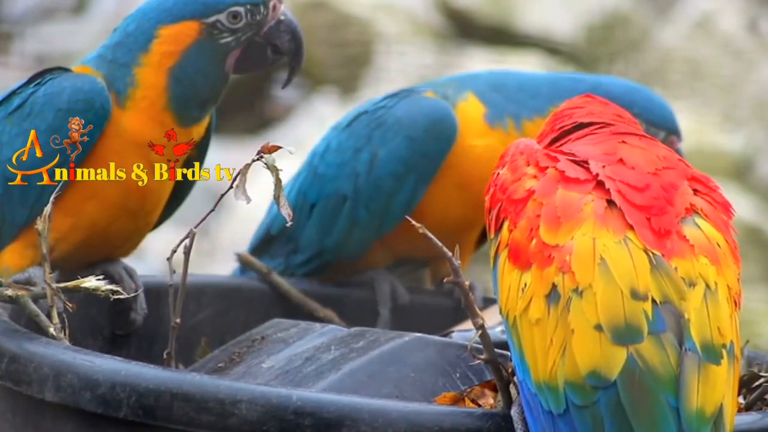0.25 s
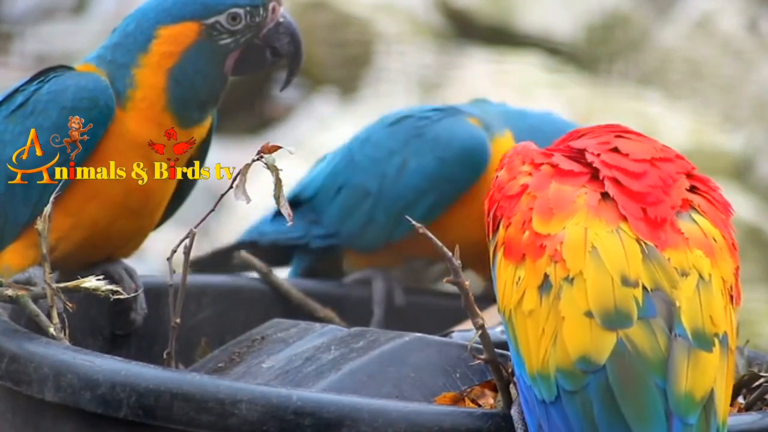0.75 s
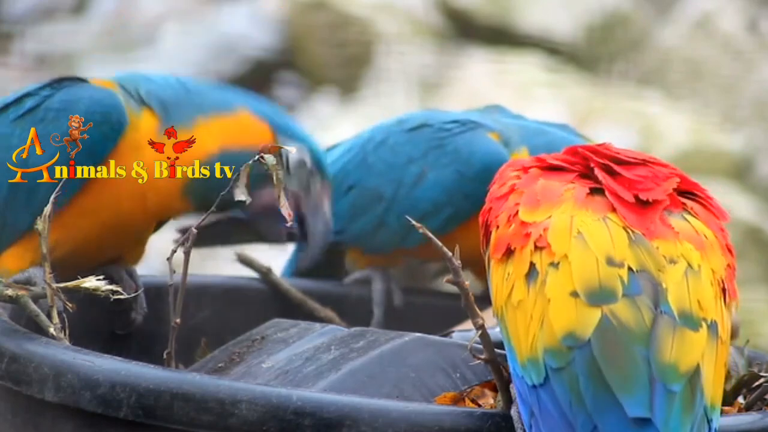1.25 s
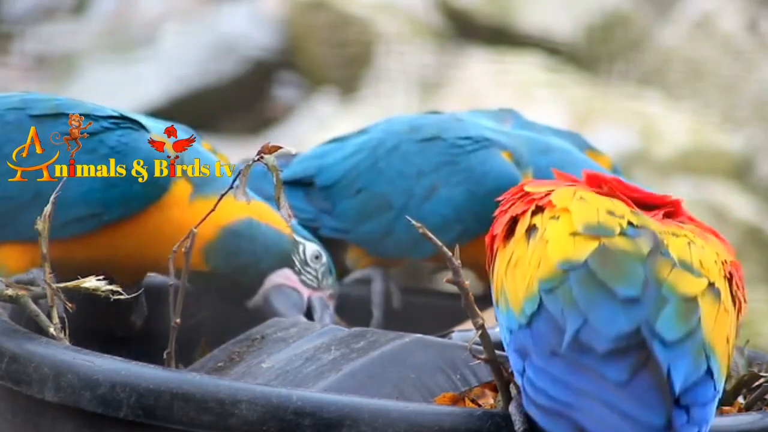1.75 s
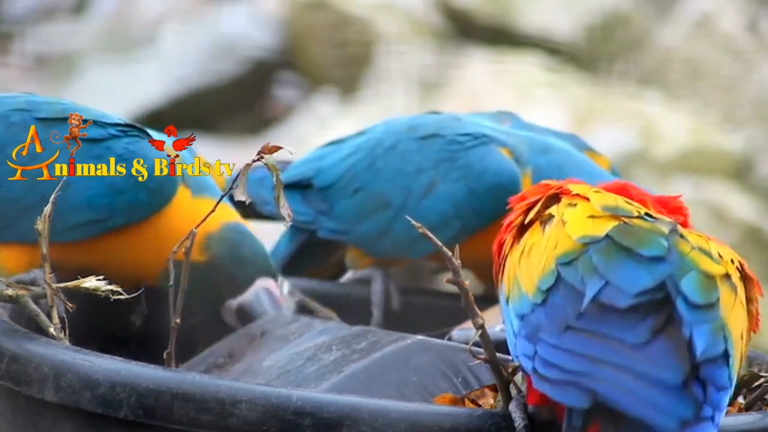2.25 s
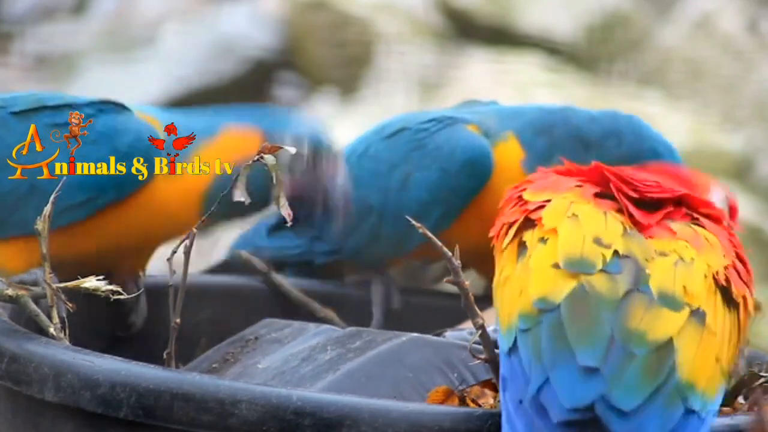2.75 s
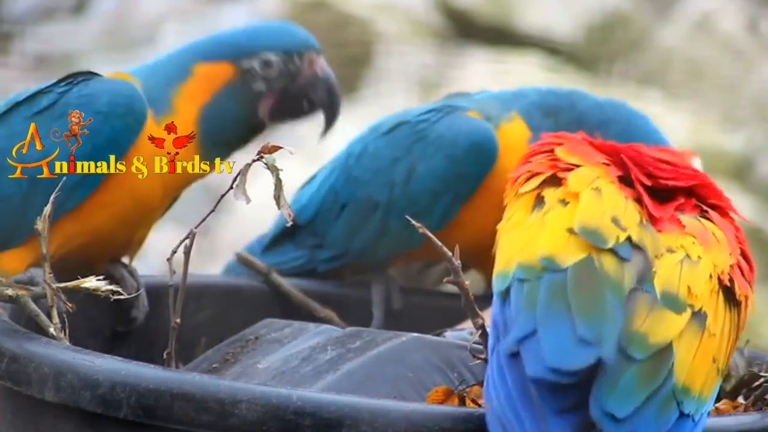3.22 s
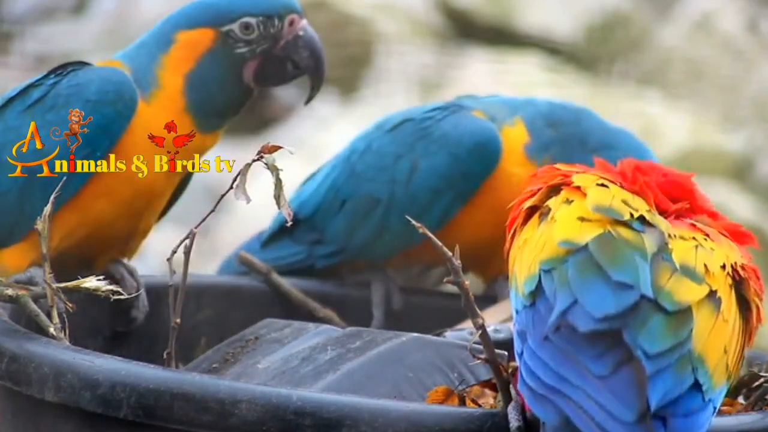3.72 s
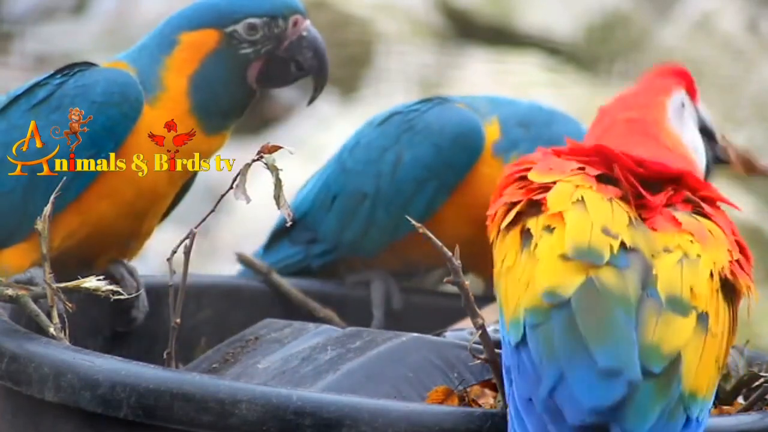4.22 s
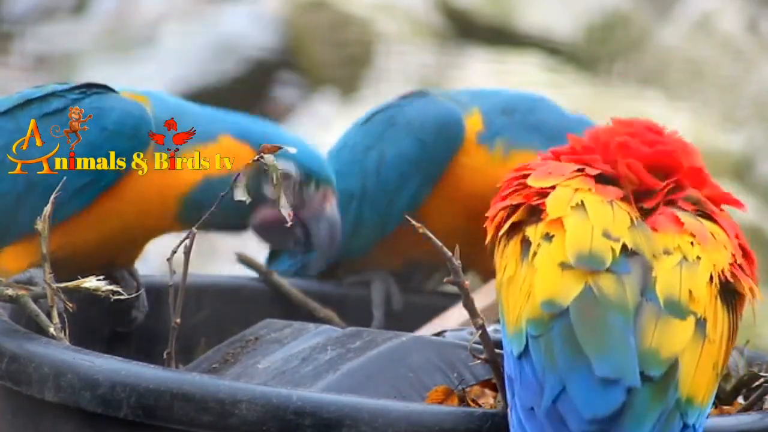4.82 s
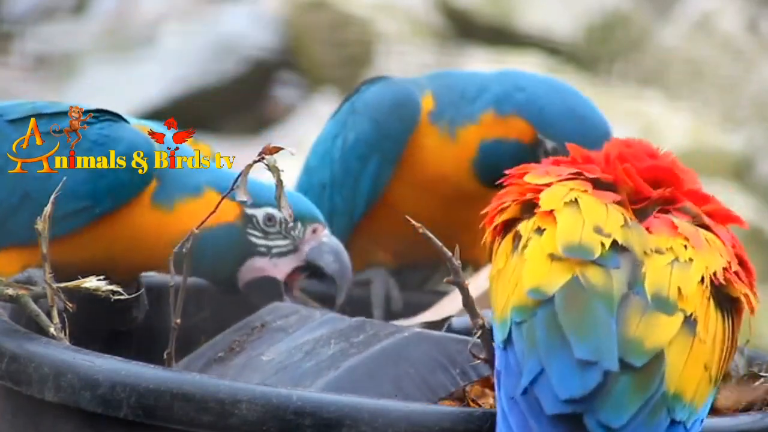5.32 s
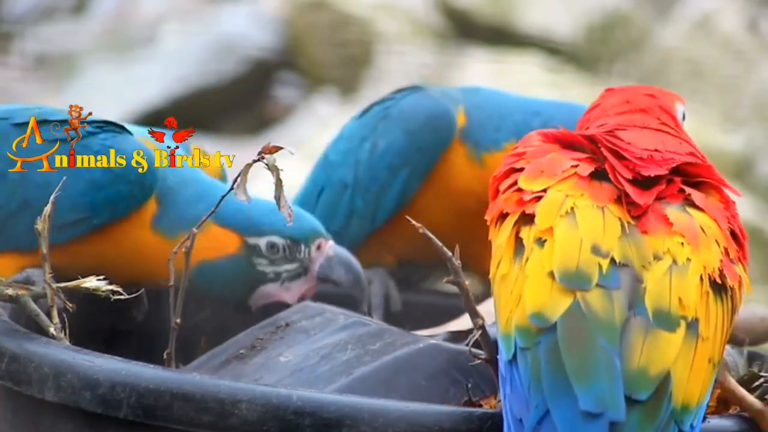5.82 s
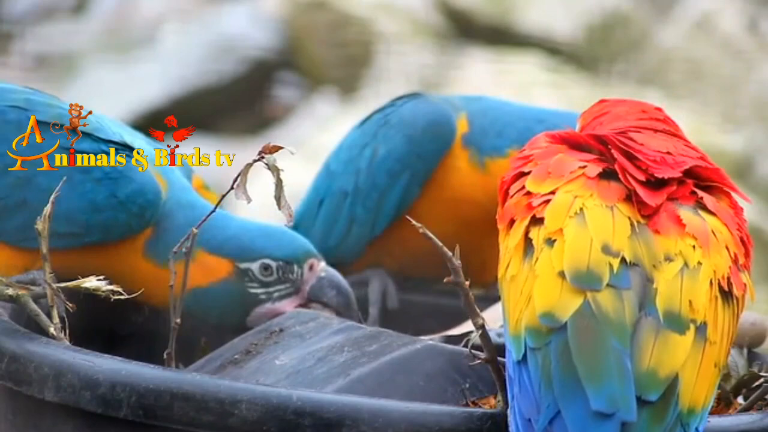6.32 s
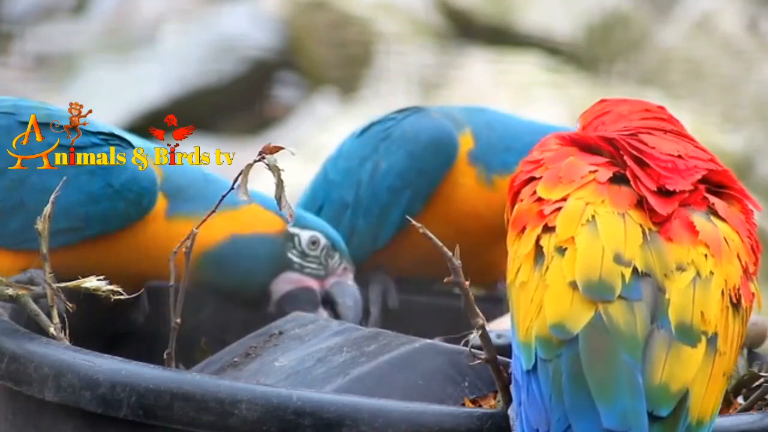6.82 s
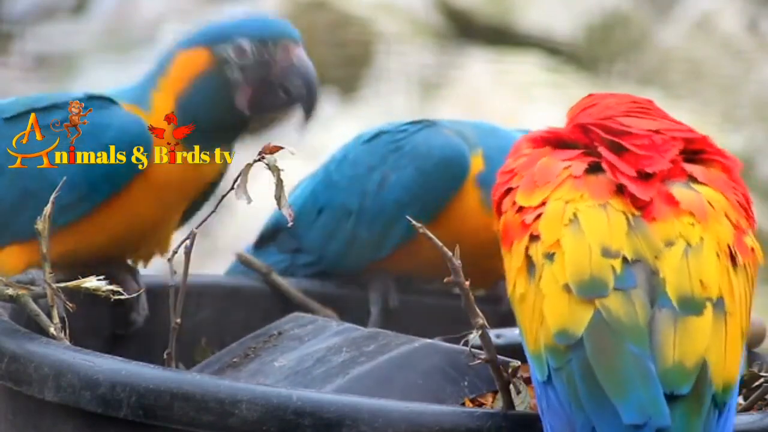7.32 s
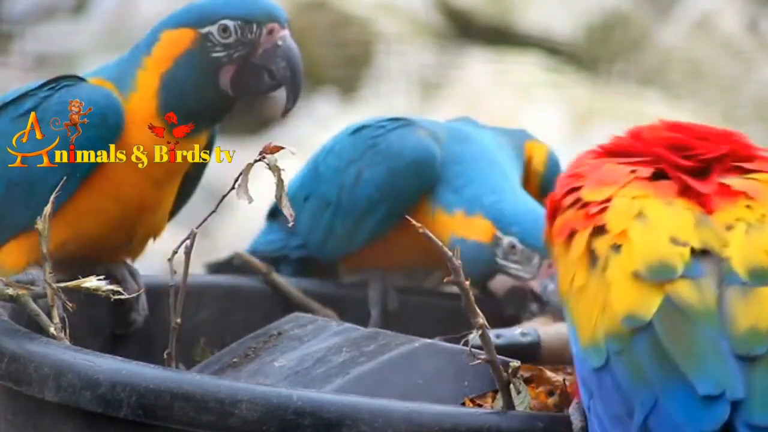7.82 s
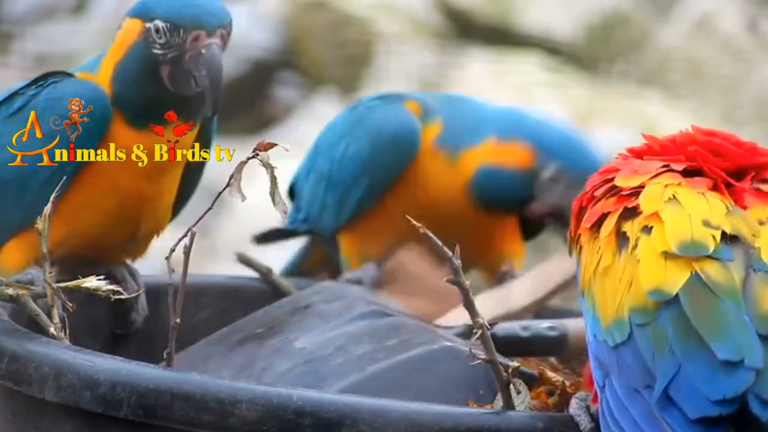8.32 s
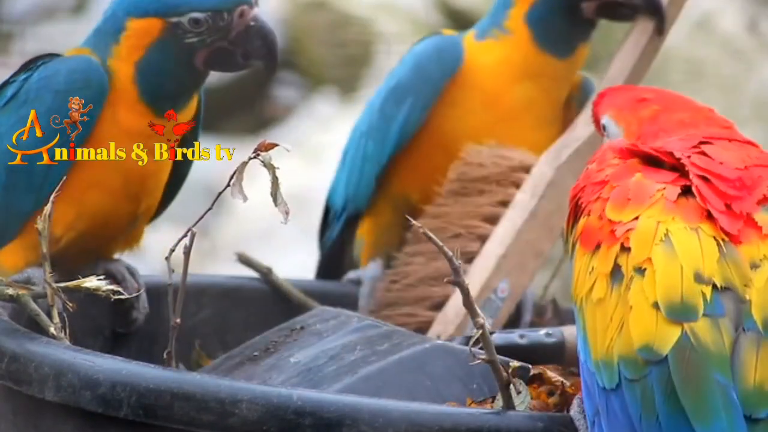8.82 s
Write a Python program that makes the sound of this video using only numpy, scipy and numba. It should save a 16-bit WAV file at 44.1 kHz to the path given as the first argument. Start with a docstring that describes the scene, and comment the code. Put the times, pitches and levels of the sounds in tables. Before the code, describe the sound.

Macaws call close to the microphone in a stony aviary, over steady soft low rumble and faint hum. At 0 s a tiny squeal and clipped squawk. From 0.4 to 1.3 s, short gritty nasal yelps, with dull plastic knocks at about 0.4, 0.7, 1.1 and 1.6 s and a very soft groan after 1 s. A rough squawk rises at 1.8 s; yelps quicken from 2.1 to 2.9 s with squeals and a cracking warble. From 3 to 4.1 s come the loudest harsh, rasping squawks, each sagging in pitch, with piercing squeals before them. A warble and short squawk at 4.6 s, then weaker squawks at 4.9, 5.2, 5.7, 6.0 and 6.4 s. Near quiet follows, with faint yelps at 7.7 and 8.1 s. From 8.3 to 8.9 s, whistled warbles, buzzy yelps and clipped squawks; a thin high squeal ends it around 9 s.

```python
"""A thin squeal and a clipped squawk open the scene over a low rumble and faint hum: macaws quarrel at a tub, close by.
Squeals and warbles are nearly pure whistles shaped by the throat; yelps are short nasal buzzes of uneven pulses.
Squawks swell and fade while the pitch sags: rough pulses, rasping air, a broken screech and clear low partials.
Knocks on the tub are a noise click and a dull ring; nearby stones and the aviary answer with a short noise tail."""
import sys
import numpy as np
from scipy import signal
from scipy.fft import rfft, irfft
from scipy.io import wavfile
from scipy.ndimage import uniform_filter1d, map_coordinates
from numba import njit

SR = 44100
rng = np.random.default_rng(int(sys.argv[2]) if len(sys.argv) > 2 else 0)


def master(y):
    """Save y as 16-bit WAV."""
    cut = np.clip(np.atleast_2d(y).T, -1, 1)
    pcm = np.round(cut * 32767)  # scale
    wavfile.write(sys.argv[1], SR, pcm.astype(np.int16))


N = 399546

# throat colour in the harsh register: (frequency [Hz], gain [dB])
HARSH = [(150, -41), (720, -8), (1000, -8), (1400, -4), (2100, -1), (2700, -3.5), (3400, -6.5),
         (4300, -2.5), (5100, -9), (6500, -16), (8500, -17), (10500, -21)]
# throat colour in the nasal register: (frequency [Hz], gain [dB])
NASAL = [(500, -21), (1000, -17), (1600, -8), (2200, -6), (3200, -8), (3900, -13), (4400, -6.5),
         (5200, -20), (8000, -19), (10500, -30)]


def undb(db):
    """Decibels to gain."""
    return 10 ** (np.asarray(db) / 20)


def unit(x):
    """Scale to a spread (standard deviation) of 1."""
    return x / (np.std(x) + 1e-12)


def colour(x, points):
    """Minimum-phase filter whose gain follows (frequency [Hz], gain [dB]) points."""
    hz, db = np.transpose(points)
    size = 4096
    bins_hz = np.arange(size // 2 + 1) * SR / size
    gain = undb(np.interp(np.log(bins_hz + 1), np.log(hz), db))
    # folding the cepstrum onto positive time makes the filter causal
    cepstrum = irfft(np.log(gain))
    cepstrum[1:size // 2] *= 2
    cepstrum[size // 2 + 1:] = 0
    impulse = irfft(np.exp(rfft(cepstrum)))
    return signal.fftconvolve(x, impulse)[:len(x)]


@njit
def resonance(x, hz, width_hz):
    """State-variable band-pass with a moving centre, gain 1 there."""
    y, band, low = np.empty(len(x)), 0., 0.
    for i in range(len(x)):
        g, damping = np.tan(np.pi * hz[i] / SR), width_hz / hz[i]
        v = (band + g * (x[i] - low)) / (1 + g * (g + damping))
        band, low, y[i] = 2 * v - band, low + 2 * g * v, damping * v
    return y


def wander(t, rate):
    """Smooth random curve of spread near 1, with `rate` new values a second."""
    place = (t - t[0]) * rate
    values = rng.standard_normal(int(place[-1]) + 2)
    return map_coordinates(values, [place], order=3, mode="nearest")


def turn(hz):
    """Phase [radians] of a vibration at a moving pitch."""
    return 2 * np.pi * np.cumsum(hz) / SR


def pulses(phase, smear=0):
    """One closure of the syrinx per cycle; smear spreads it over the cycle, the treble coming later."""
    return unit(sum(np.cos(k * phase - smear * k ** 2) for k in range(1, 23)))


def throat(x, points, beak_hz, width_hz, beak_db):
    """Fixed windpipe colour plus the resonance of the open beak, evened out so the call sets the loudness."""
    y = colour(x, points)
    y = y + undb(beak_db) * resonance(y, beak_hz, float(width_hz))
    running_rms = np.sqrt(uniform_filter1d(y ** 2, size=1300) + 1e-12)
    return y / running_rms


def call_span(start, length, attack_s, release_s):
    """Time, a gate with soft edges and the share of the call gone by (0-1)."""
    first = int(max(start - attack_s, 0) * SR)
    t = np.arange(first, int((start + length + release_s) * SR)) / SR
    inside = np.minimum((t - start) / attack_s, (start + length - t) / release_s)
    gate = np.sin(np.pi / 2 * np.clip(1 + inside, 0, 1)) ** 2
    return t, gate, np.clip((t - start) / length, 0, 1)


def add(out, t, x):
    """Mix x into out from time t[0] on."""
    start = int(round(t[0] * SR))
    out[start:start + len(x)] += x[:max(N - start, 0)]


def surroundings():
    """Steady low rumble of coloured noise, with a faint hum of sines wavering in pitch and level."""
    # rumble colour: (frequency [Hz], gain [dB])
    air_colour = [(30, -47.5), (131, -6.5), (213, -3.5), (445, -12.5), (744, -11), (1750, -18.5),
                  (2350, -25), (3080, -30), (10500, -44.5)]
    # a distant machine's hum: (frequency [Hz], level [dB])
    hum_tones = [(143, -55), (357, -54)]
    air_db = -43
    t = np.arange(N) / SR
    bed = unit(colour(rng.standard_normal(N), air_colour)) * undb(air_db)
    for hz, db in hum_tones:
        phase = turn(hz * (1 + .005 * wander(t, 5)))
        bed = bed + undb(db + 2.5 * wander(t, 1.5)) * np.sin(phase)
    return bed


def whistle(t, hz, points, octave_db, odd_db=2):
    """A slightly unsteady tone whose overtones the throat shapes."""
    phase = turn(hz * (1 + .009 * wander(t, 130) + .016 * wander(t, 1200)))
    throat_hz, throat_db = np.transpose(points)
    tone = 0
    for k in range(1, 7):
        # the windpipe, closed at one end, favours the odd partials
        source_db = octave_db * np.log2(k) + odd_db * (k % 2)
        partial_db = source_db + np.interp(k * hz, throat_hz, throat_db)
        tone = tone + undb(partial_db) * np.sin(k * phase)
    return unit(tone)


def squeal(start, length, first_hz, last_hz, middle_db, rise_db, octave_db=-4, shimmer_db=2.5):
    """The syrinx stretched tight: a nearly pure whistle that holds its note and slides off it."""
    slide_curve = 1.8  # above 1 the pitch holds first and moves late
    arch_db = 3.5  # weaker by this at both ends
    t, gate, place = call_span(start, length, attack_s=.011, release_s=0.006)
    hz = first_hz + (last_hz - first_hz) * place ** slide_curve
    db = middle_db + rise_db * (place - .5) - arch_db * (2 * place - 1) ** 2
    return t, gate * undb(db + shimmer_db * wander(t, 256)) * whistle(t, hz, HARSH, octave_db)


def walls(x, near_t60_s=0.063, far_db=-12, far_t60_s=0.61):
    """Decaying noise echo: tub and nearby stones answer at once, the aviary lasts longer; treble is lifted."""
    age = np.arange(SR) / SR
    near, far = (rng.standard_normal(SR) * undb(-60 * age / t60) for t60 in (near_t60_s, far_t60_s))
    tail = .25 * near / np.linalg.norm(near) + undb(far_db) * far / np.linalg.norm(far)
    tail = colour(tail, [(600, 0.33), (2200, 4.55), (4500, 6.4), (10000, 8.0)])
    return signal.fftconvolve(x, tail)[:N]


def screech(t, hz, chaos=0.0678, shake_db=4, octave_db=-4):
    """The tight side of the syrinx out of control: a broken, shaking band of tone and its octave."""
    phase = turn(hz * (1 + chaos * wander(t, 1000) + .025 * wander(t, 120)))
    tone = np.sin(phase) + undb(octave_db) * np.sin(2 * phase)
    return unit(tone * undb(shake_db * np.tanh(wander(t, 445.6))))


def squawk(start, length, first_hz, last_hz, peak_db, peak_place, beak_hz, bright_db):
    """Overblown syrinx: cycles of very uneven length and strength, a rasp of air in each, and a screech under strain."""
    full_db = -20  # peak level at which the strain is full
    swell_db, fade_db = 2.5, 6  # gain up to the peak and loss after it, at full strain
    soft_swell = 0.25  # extra swell [dB] per dB below full strain; the fade gets half
    sag_curve = 1.2  # above 1 the pitch holds first and sags late
    full_rough, rough_loss = .77, .014  # mid-call roughness at full strain, loss per dB below it
    edge_rough = 0.375  # rougher by this share at both ends
    screech_db, screech_loss = -1, 1  # screech against the rough voice at full strain, dB lost per dB below it
    clear_db = -11.5  # clear low partials against the rough voice

    # one push of air: the level swells and fades, the pitch sags, the voice is roughest at the ends
    t, gate, place = call_span(start, length, attack_s=.014, release_s=0.02404)
    ease_db = max(full_db - peak_db, 0)
    peak_at = np.clip(peak_place, .05, .95)
    below_peak_db = [swell_db + soft_swell * ease_db, 0, fade_db + soft_swell * ease_db / 2]
    db = peak_db - np.interp(place, [0, peak_at, 1], below_peak_db)
    hz = first_hz + (last_hz - first_hz) * place ** sag_curve
    rough = (full_rough - rough_loss * ease_db) * (1 + edge_rough * (2 * place - 1) ** 2)

    # the two sides of the syrinx beat unevenly, shaking pitch and strength
    flutter = np.tanh(wander(t, 380))
    hz = hz * (1 + .025 * rough * wander(t, 70))
    phase = turn(hz * (1 + rough * (.055 * wander(t, 1000) + .05 * flutter)))
    puffs = (1 + np.cos(phase)) * rng.standard_normal(len(t))
    rasp = unit(colour(puffs, [(900, -12), (3500, 0)]))
    # brief spells of strong and weak cycles fill in between the harmonics
    doubling = 1 + .9 * rough * wander(t, 110) * np.cos(phase / 2)
    source = pulses(phase, smear=.35) * doubling + .5 * rough * rasp
    source = source * np.exp(.5 * rough * flutter)

    # the tongue darts about and tears the sound into shifting bands
    tongue = 0
    for band_hz in (1500, 2600, 4100, 7000):
        moving_hz = band_hz * np.exp(.14 * wander(t, 50))
        tongue = tongue + resonance(source, moving_hz, band_hz / 10.)
    source = source + 1.5 * tongue

    # the beak closes as the pitch falls, so its resonance sinks too
    sinking_hz = beak_hz * np.sqrt(hz / hz.mean())
    tilted = [(f, gain_db + bright_db * np.log2(max(f / 2000, 1))) for f, gain_db in HARSH]
    voice = throat(source, tilted, sinking_hz, width_hz=1050, beak_db=-2.5)

    # the lowest partials keep their pitch through the chaos, coming and going
    steady = turn(hz * (1 + .02 * wander(t, 500)))
    clear = 0
    for k, strength in enumerate((.6, 1, .9, .3), 1):
        clear = clear + strength * np.sin(k * steady) * undb(4 * wander(t, 40))
    # a squeal lives on inside the squawk as a chaotic screech
    strain = undb(screech_db - screech_loss * ease_db)
    voice = unit(voice + strain * screech(t, sinking_hz) + undb(clear_db) * unit(clear))
    # the treble needs full pressure: it comes last and goes first
    mellow = resonance(voice, sinking_hz, 2500.)
    return t, gate * undb(db) * (mellow + gate ** 2 * (voice - mellow))


def knock(s, db, hz, click_db, ring_hz=70, click_s=0.0029):
    """Beak or claw on the tub: a dry noise click and the brief, dull ring of plastic, ring_hz wide."""
    age = np.arange(SR // 10) / SR
    ring = resonance(signal.unit_impulse(len(age)), np.full(len(age), float(hz)), float(ring_hz))
    click = resonance(rng.standard_normal(len(age)), np.full(len(age), 3200.), 1800.0)
    click = click * np.exp(-age / click_s)
    return s + age, 2 * undb(db) * (ring / ring.max() + undb(click_db) * click)


def yelp(middle, length, hz, db, beak_hz, arch=0.045, air_db=-14, grit_db=2.5, gape=0.11, jitter=0.018):
    """A short, gritty buzz of uneven pulses; pitch and beak resonance arch as the beak opens and shuts."""
    t = np.arange(int((middle - length) * SR), int((middle + length) * SR)) / SR
    place = 2 * (t - middle) / length  # -1 to 1 over the call
    phase = turn(hz * (1 - arch * place ** 2 + jitter * wander(t, 600) + .012 * wander(t, 90)))
    buzz = pulses(phase, smear=0.157) * undb(grit_db * wander(t, 346))
    source = buzz + undb(air_db) * rng.standard_normal(len(t))
    opening_hz = beak_hz * np.exp(gape * (.3 - place ** 2) + .04 * wander(t, 100))
    voice = throat(source, NASAL, opening_hz, width_hz=1060, beak_db=6.5)
    return t, undb(db) * voice / (1 + np.abs(place) ** 6)


def warble(points, octave_db=-7, shimmer_db=1.0, rasp_db=-18, crack_octaves_per_s=25):
    """A whistle that cracks from note to note; it turns hoarse while the pitch is on the move."""
    s, hz, db = np.transpose(points)
    t, gate, _ = call_span(s[0], s[-1] - s[0], attack_s=.011, release_s=0.006)
    hz = np.interp(t, s, hz)
    octaves_per_s = uniform_filter1d(np.abs(np.gradient(np.log2(hz), t)), size=600)
    hoarse = np.tanh(octaves_per_s / crack_octaves_per_s)
    tone = whistle(t, hz * (1 + .03 * hoarse * wander(t, 700)), NASAL, octave_db)
    # the air puffs at half the pitch
    puffs = (1 + np.cos(turn(hz) / 2)) * rng.standard_normal(len(t))
    rasp = unit(colour(puffs, HARSH))
    level = undb(np.interp(t, s, db) + shimmer_db * wander(t, 252))
    return t, gate * level * (tone + undb(rasp_db) * (1 + hoarse) * rasp)


def scene():
    """All the calls and knocks, their echo and the surroundings."""
    # thin whistled calls: (start [s], length [s], first pitch [Hz], last pitch [Hz], level in the middle [dB],
    #   rise from start to end [dB])
    squeals = [ (0, 0.029, 2188, 2030, -27, -2), (2.201, 0.09, 1690, 1296, -34, 20),
               (2.669, 0.044, 1732, 1375, -20.5, -3), (2.911, 0.077, 3028, 3023, -21.5, 3),
               (2.963, 0.089, 1687, 1368, -25, 20), (2.976, 0.033, 2742, 2180, -16.5, 9),
               (3.194, 0.065, 2900, 2764, -31.5, 15), (3.26, 0.044, 2220, 2165, -15, -5.5),
               (3.432, 0.031, 2293, 1990, -29, -7), (3.505, 0.032, 2355, 2430, -32, -2),
               (3.541, 0.032, 1578, 1670, -29, -1), (3.578, 0.023, 2077, 2114, -15, 5),
               (3.902, 0.039, 2080, 2140, -18, 6), (4.89, 0.021, 2305, 2180, -39.5, 3),
               (5.159, 0.047, 3200, 2940, -34, 15), (5.641, 0.022, 3020, 3000, -45.5, 4),
               (5.663, 0.017, 2335, 2340, -40, 2), (5.928, 0.04, 3130, 3160, -38, 9),
               (5.971, 0.015, 2890, 2450, -29.5, 3), (6.355, 0.01, 2365, 2320, -39.5, -5),
               (8.141, 0.028, 2400, 2160, -41.5, 3), (8.18, 0.068, 3070, 3160, -43.5, 1),
               (8.823, 0.017, 2137, 2074, -29, 5), (9.015, 0.056, 2970, 3080, -32, 16.5)]
    # harsh calls and a soft groan: (start [s], length [s], first pitch [Hz], last pitch [Hz], peak level [dB],
    #   place of the peak [0-1], beak resonance [Hz], treble tilt above 2 kHz [dB per octave])
    squawks = [ (0.019, 0.024, 727, 643, -31, 0.4, 1830, -1), (1.06, 0.45, 503.6, 459, -47, 0.66, 2010, -2),
               (1.762, 0.16, 832, 568, -24, 0.86, 2186, 1), (2.3, 0.036, 688, 624, -24, 0.46, 1785, -5.5),
               (2.399, 0.023, 757, 693, -25.5, 0.4, 2500, 3), (2.709, 0.032, 735, 656, -22.5, 1, 1443, 2),
               (3.003, 0.081, 774, 627.4, -18.5, 0.1, 1600, 2.5),
               (3.285, 0.12, 790, 604, -15.5, 0.38, 1988, -0.5),
               (3.603, 0.16, 746, 599, -16, 0.45, 2052, -0.5),
               (3.93, 0.18, 759, 566.5, -18, 0.24, 1997, -.5),
               (4.144, 0.16, 823, 737.5, -26.5, 0.62, 2395, -1.5),
               (4.586, 0.098, 1020, 868, -29, 0.2, 3020, -0.5),
               (4.919, .175, 794, 569, -30, 0.86, 1784, -1),
               (5.207, 0.16, 868, 626, -24.5, 0.27, 2404, 1.5),
               (5.69, .15, 800.5, 619, -31, 0.52, 2036, -2), (5.982, 0.19, 894, 595.4, -28, 0.05, 2560, 1),
               (6.37, 0.18, 750, 631.4, -31.5, 0.55, 2100, -2.5),
               (8.433, 0.051, 924, 893, -30, 0.54, 2600, -2.5),
               (8.848, 0.041, 763, 688, -27.5, 1, 1550, -3)]
    # beak and claw on the tub: (time [s], level before doubling the amplitude [dB], ring [Hz],
    #   click gain against the ring [dB])
    knocks = [(0.371, -37, 717, 0), (.692, -34, 460, 0), (1.094, -40.5, 880, 8), (1.597, -42, 805, 0)]
    # nasal calls: (middle [s], length [s], pitch [Hz], level [dB], beak resonance [Hz])
    yelps = [ (0.477, 0.04, 495.5, -28, 3100), (0.645, 0.053, 514, -27.5, 3000),
             (0.788, 0.039, 504.6, -27, 3200), (0.94, 0.042, 504, -26, 2950),
             (1.028, 0.025, 687, -37, 2320), (1.182, 0.017, 394, -39, 2080),
             (1.33, 0.014, 394.5, -37, 2000), (1.778, 0.02, 408, -31, 2800),
             (2.096, 0.039, 529.7, -28, 2470), (2.255, 0.039, 568, -25.5, 2180),
             (2.389, 0.032, 549, -26, 2200), (2.525, 0.035, 562, -27, 2160), (2.653, .036, 530, -29, 3370),
             (2.778, 0.019, 561, -25.5, 2300), (2.913, 0.031, 563, -27.5, 2300),
             (7.736, 0.043, 519, -45, 2590), (8.075, 0.023, 536, -40.5, 2620),
             (8.621, 0.034, 546, -23.5, 2340), (8.759, 0.038, 533, -26.5, 4130)]
    # unbroken runs of notes, one list each: (time [s], pitch [Hz], level of the whistle [dB])
    warbles = [
        [(2.412, 2284, -30), (2.422, 2676, -38), (2.439, 1892, -27), (2.449, 2360, -26.5), (2.457, 1678, -28.5),
         (2.486, 1940, -28), (2.506, 1600, -32)],
        [(4.568, 996, -34), (4.583, 1267, -29), (4.588, 973, -30), (4.611, 1290, -28), (4.619, 980, -32),
         (4.655, 957, -39), (4.703, 860, -40)],
        [(8.279, 2200, -36.5), (8.314, 2040, -36), (8.322, 1587, -31.5), (8.402, 1650, -35.5),
         (8.41, 2230, -28), (8.426, 2094, -26.5), (8.433, 1660, -36), (8.484, 1874, -29)],
        [(8.655, 2193, -45), (8.68, 2220, -31.5), (8.713, 2425, -28), (8.727, 1622, -39), (8.825, 1647, -31),
         (8.872, 1394, -37)],
    ]
    birds = np.zeros(N)
    for source, table in (squeal, squeals), (squawk, squawks), (knock, knocks), (yelp, yelps):
        for row in table:
            add(birds, *source(*row))
    for points in warbles:
        add(birds, *warble(points))
    return (birds + walls(birds) + surroundings())[None]


def record(dry):
    """The loudest peaks are rounded off, the deepest bass drops away, and the recorder cuts the top steeply."""
    bass_hz, top_hz = 45, 10800
    rounded = dry / (1 + (dry / .8) ** 6) ** (1 / 6)
    trimmed = signal.sosfilt(signal.butter(3, bass_hz, "high", fs=SR, output="sos"), rounded)
    return signal.sosfilt(signal.ellip(10, .2, 70, top_hz, fs=SR, output="sos"), trimmed)


dry = scene()
out = record(dry)
master(out)
```